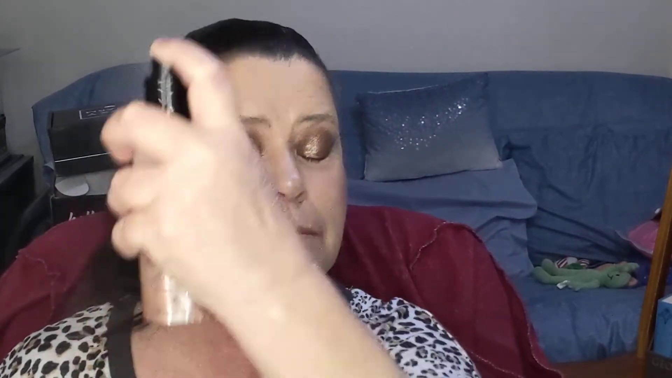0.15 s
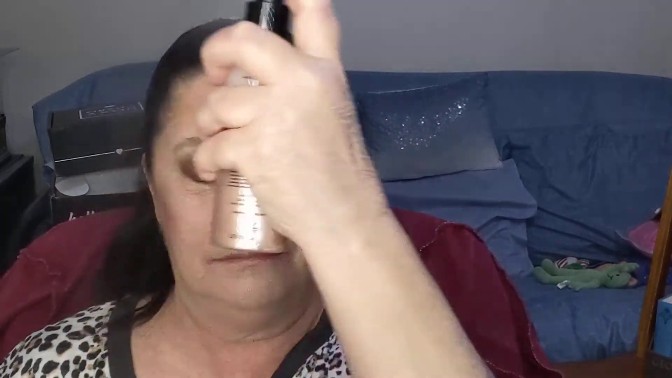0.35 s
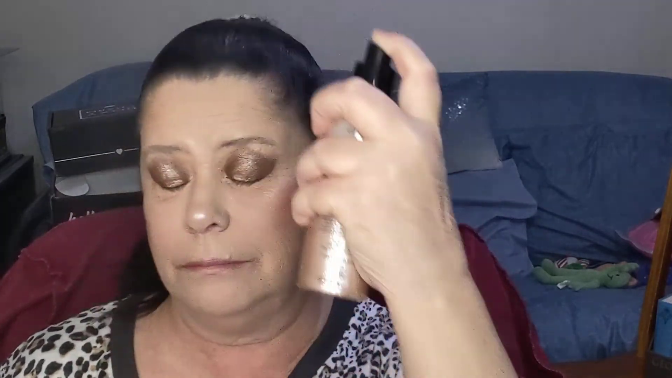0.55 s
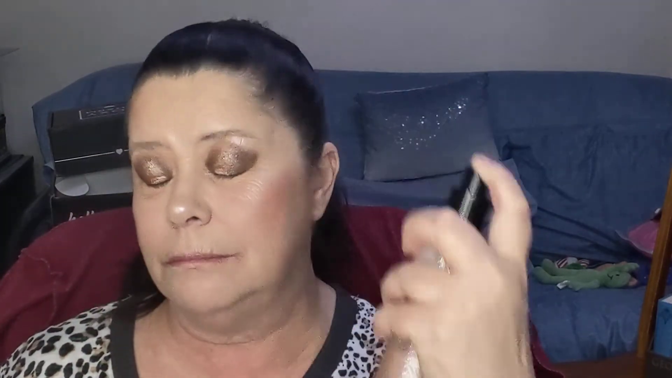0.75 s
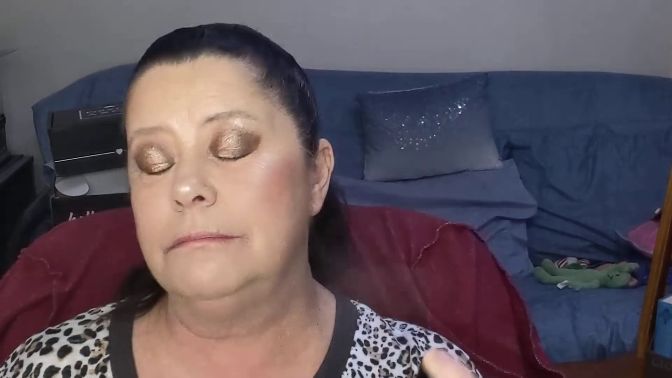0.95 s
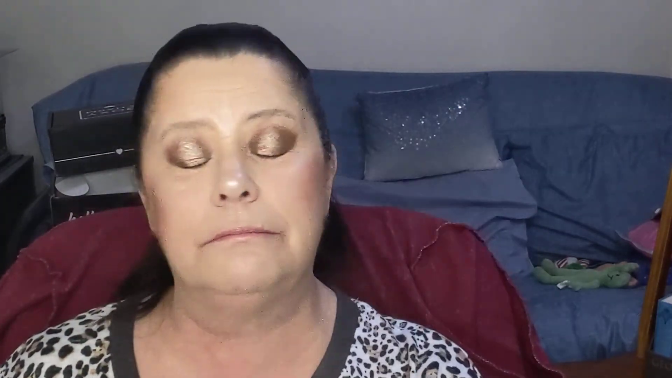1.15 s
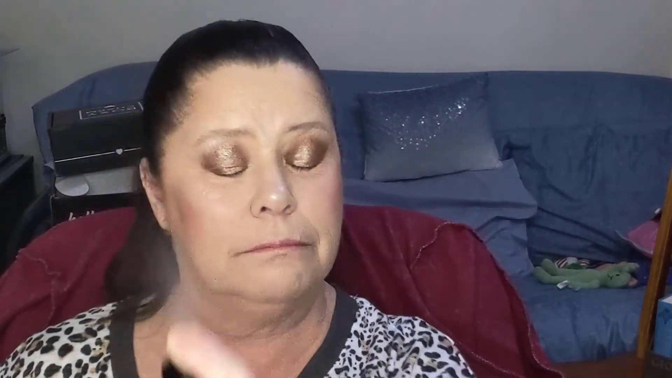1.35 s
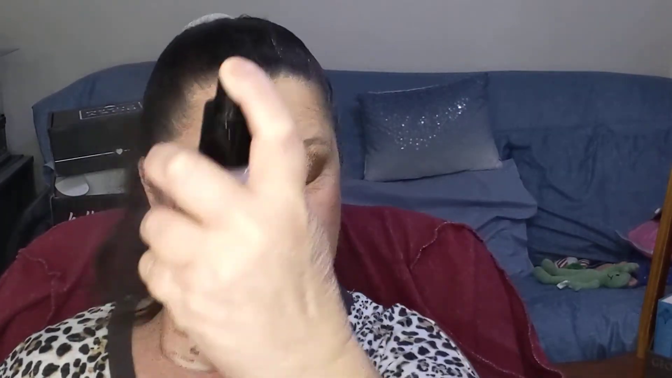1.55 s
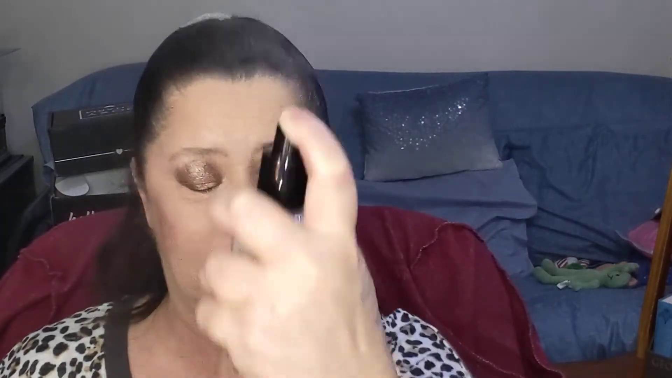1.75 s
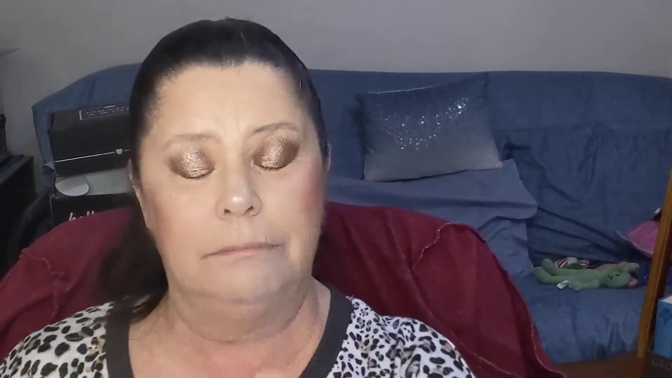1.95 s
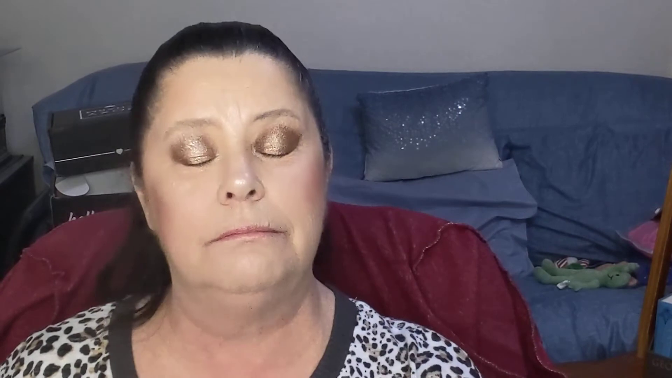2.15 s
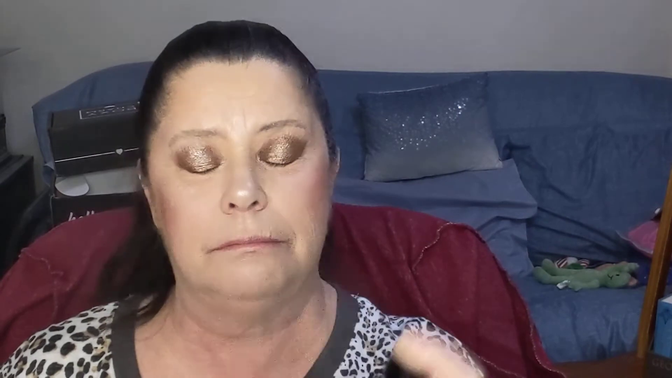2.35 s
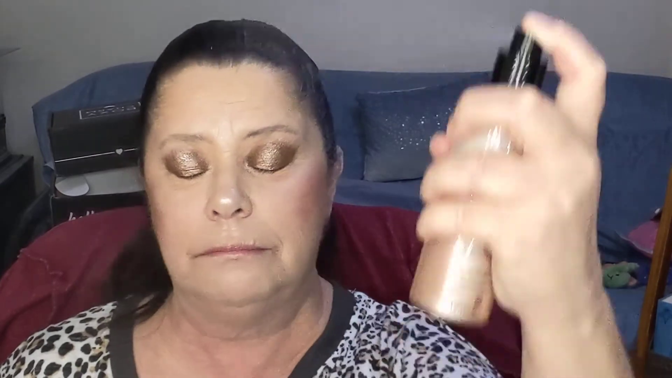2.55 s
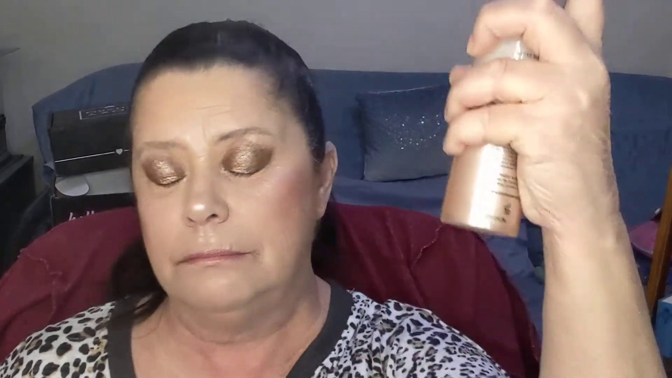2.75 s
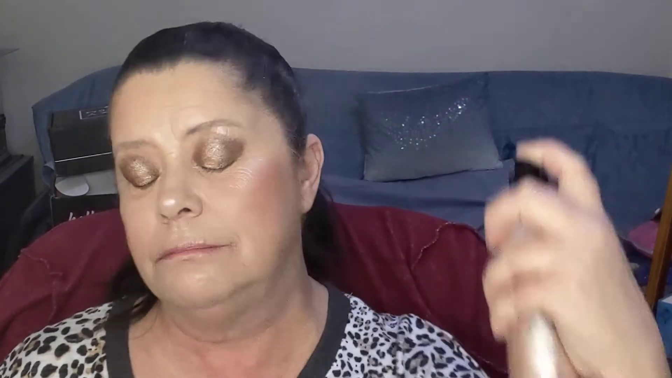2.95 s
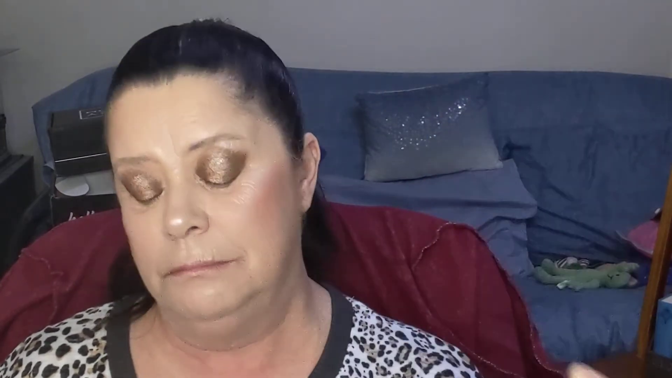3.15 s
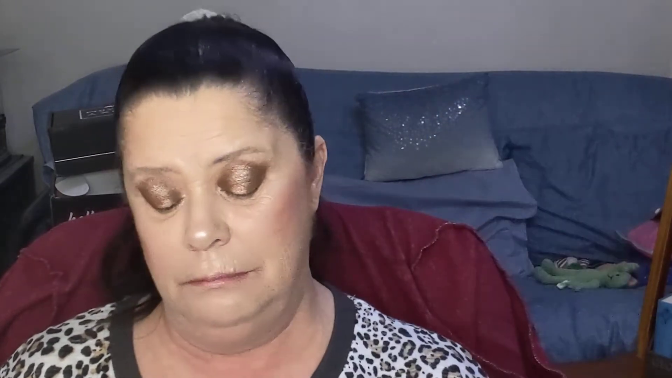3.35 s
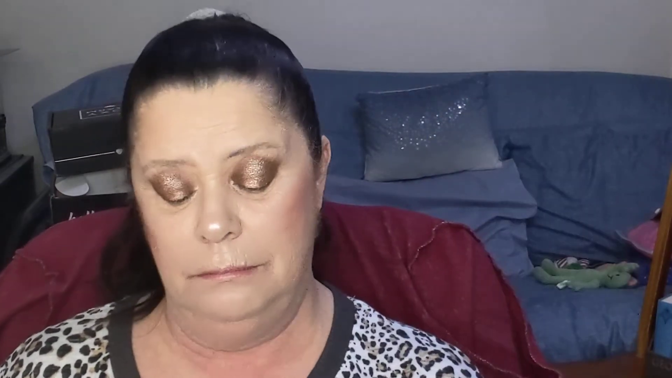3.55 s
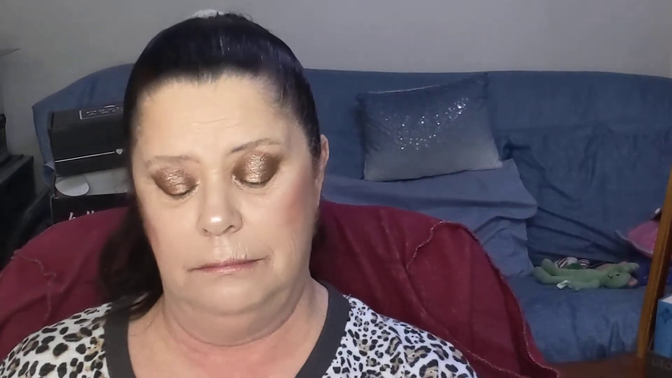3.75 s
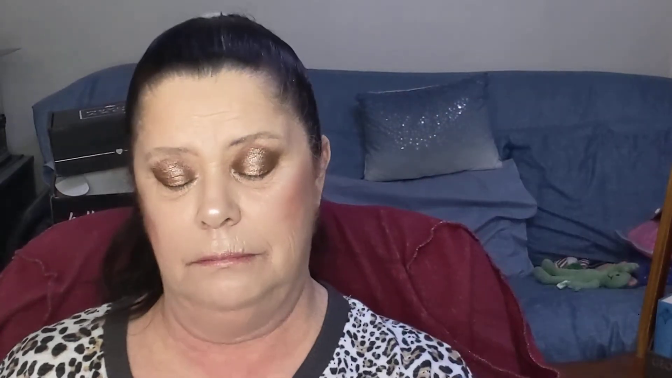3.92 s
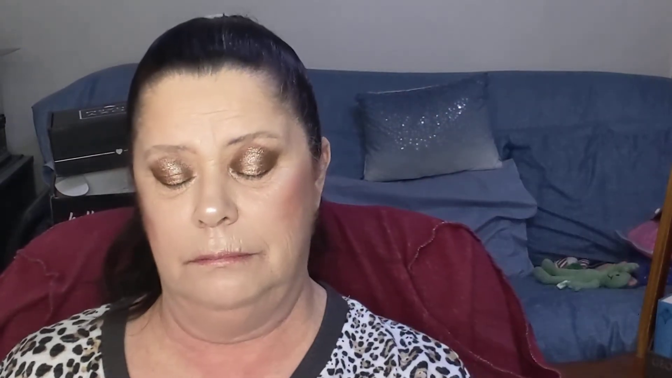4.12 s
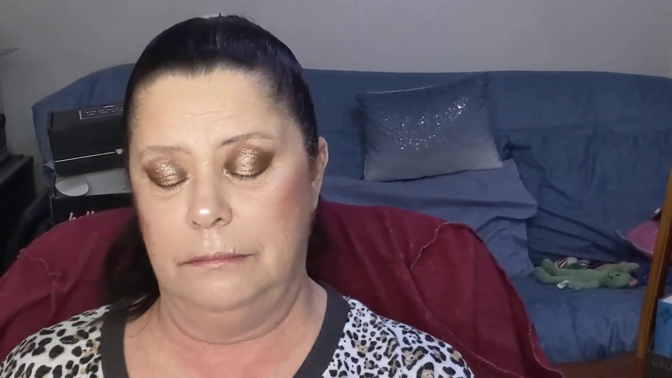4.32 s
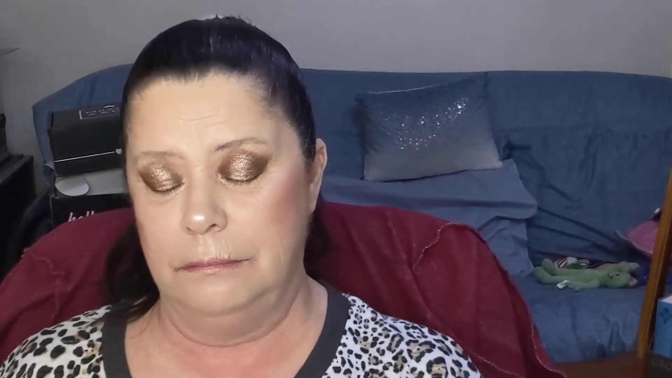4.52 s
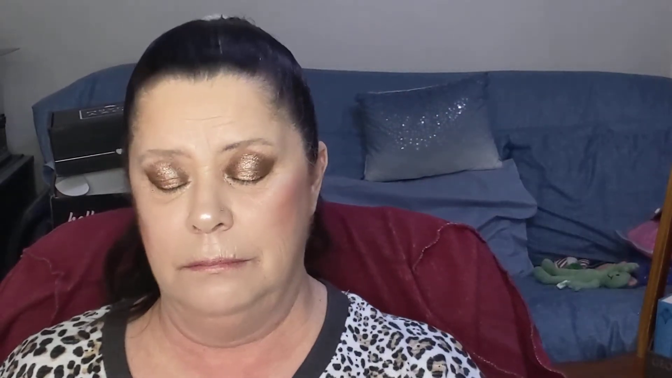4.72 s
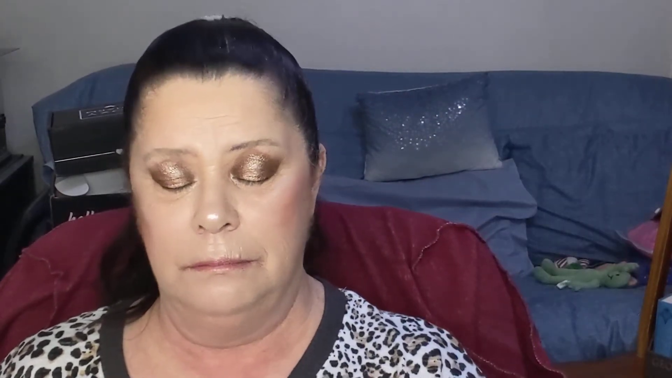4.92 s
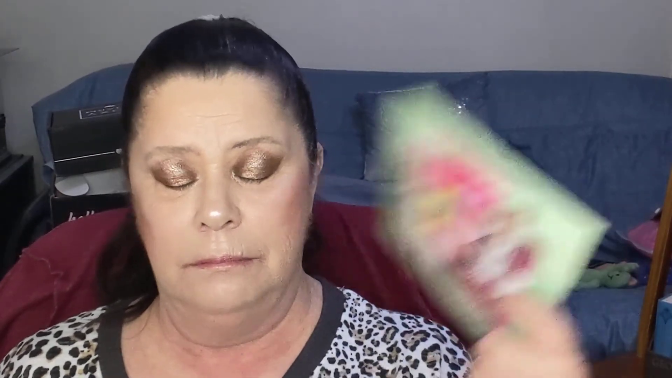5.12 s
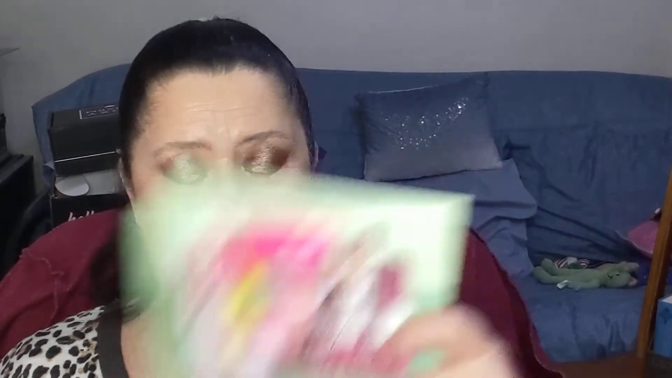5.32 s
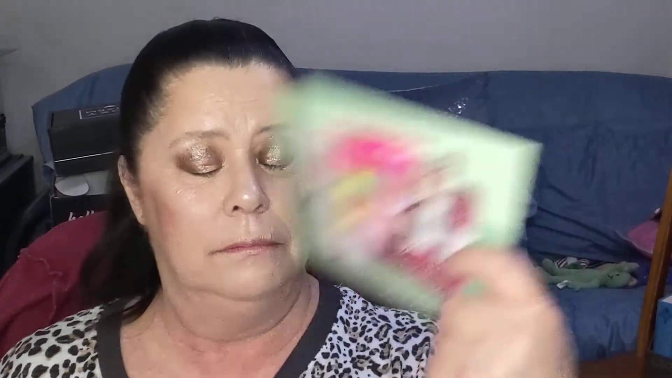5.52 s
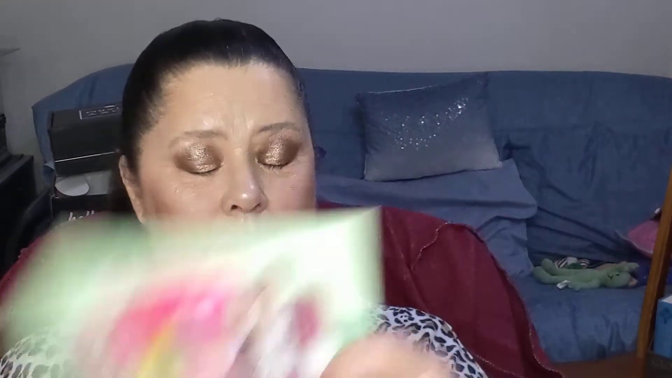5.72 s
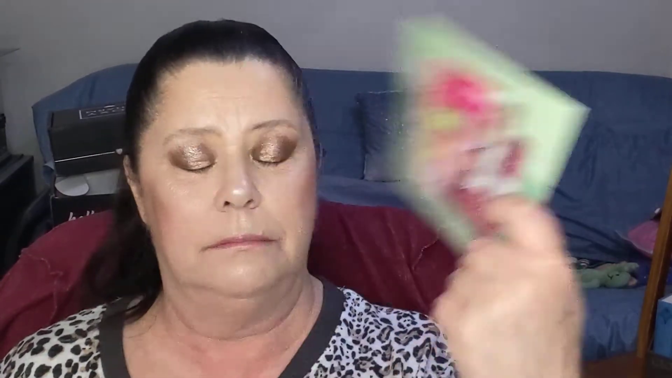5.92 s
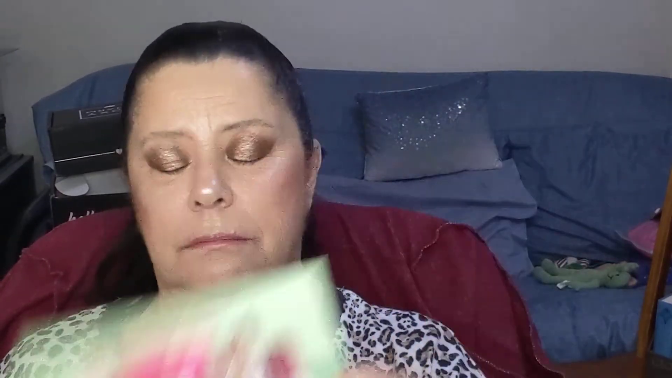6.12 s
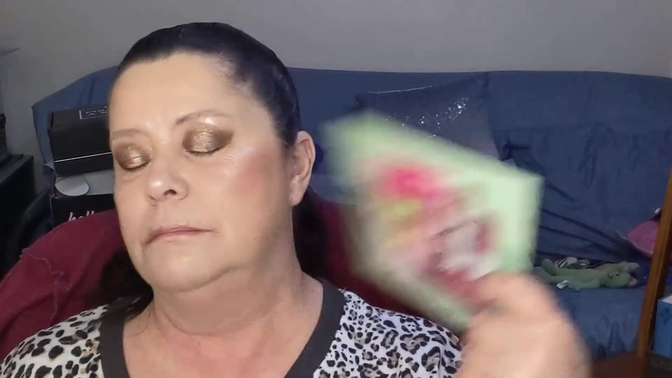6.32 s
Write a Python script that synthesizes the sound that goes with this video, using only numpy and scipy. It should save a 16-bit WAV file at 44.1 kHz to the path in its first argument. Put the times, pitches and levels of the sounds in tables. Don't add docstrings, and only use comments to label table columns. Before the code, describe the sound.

A quiet furnished room with low mains hum, soft air hiss and faint rumble, heard close in stereo. From 0 to 2.95 seconds a small pump bottle is pressed twelve times: strokes end near 0.05, 0.29, 0.52, 0.74, 0.99, 1.28, 1.53, 1.79, 2.05, 2.45, 2.7 and 2.95. Each is a tenth-of-a-second fine, bright hiss, stopped by a sharp plastic knock, with small ticks as the head springs back. The bottle wall pops softly around 1.9. From 3.2 to 3.7 fingers faintly tick and brush the label. At 3.94 the bottle lands on a light table, a loud hollow low thump with clatter, rocking in smaller knocks and a slight scrape until about 4.2. A card is touched at 4.64, snaps crisply at 4.72, then rubs and slides with gritty papery sounds from 4.9 to 5.2, strongest near 5.1. Only quiet room tone remains.

```python
import sys
import numpy as np
from scipy import signal
from scipy.fft import rfft, irfft, next_fast_len
from scipy.io import wavfile
from scipy.ndimage import uniform_filter1d, map_coordinates

SR = 44100
rng = np.random.default_rng(int(sys.argv[2]) if len(sys.argv) > 2 else 0)


def dump(signal):
    limited = np.clip(np.atleast_2d(signal).T, -1, 1)
    pcm = np.round(limited * 32767).astype(np.int16)
    wavfile.write(sys.argv[1], SR, pcm)


def invert_db(x):
    u = np.asarray(x, float) / 20
    return 10 ** u


N = 281358

# (frequency [Hz], level [dB])
AIR_COLOUR = [(150, -43), (250, -10), (324, -12.5), (360, -6), (575, -16), (616, -8.5), (672, -15),
              (887, -11.5), (1300, -12), (1420, -19.5), (1780, -10), (1940, -15), (4610, -22.5),
              (14000, -35.5), (15800, -46)]
RUMBLE_COLOUR = [(12, -44), (20, -23), (43, -11), (70, -12), (99, -6), (119, -3), (161, -0.5), (202, 1.5),
                 (290, -14.5), (330, -12.5), (430, -50.5), (730, -120)]
HUM_TONES = [(120.2, -68.5), (61.5, -79), (178, -75.5)]
# (frequency [Hz], correlation [-1 to 1])
AIR_ALIKE = [(60, 0.75), (180, 0.21), (550, 0.76), (1650, -0.34), (4970, 0.19), (15000, 0.059)]
MIST_ALIKE = [(200, 0.67), (600, 0.95), (1600, 0.98), (4000, 0.43), (8000, 0.17), (15000, 0.23)]
# (frequency [Hz], t60 [s])
ROOM_T60 = [(150, 0.13), (1500, 0.22), (5000, 0.29), (14000, 0.1845)]
# (time [s], left port ahead by [microseconds])
HAND_LEAD = [(0, 25), (.7, 90), (1.2, 21), (2, 60), (2.7, 150), (3.2, 138), (3.8, 0), (4.6, -60),
             (5.3, -53)]
# (frequency [Hz], left minus right [dB])
PORT_DIFFERENCE = [(60, -1.5), (150, 2), (400, -0.5), (2000, -1), (7000, 0), (11000, 4.5), (15000, 11)]

# (start [s], piston at its stop [s], jet level [dB], knock level [dB], spring ping level [dB])
STROKES = [(-.07, .05, -46, -32.5, -54), (.168, .2852, -46.5, -30.5, -54), (.404, .519, -47.5, -33.5, -50),
           (.635, 0.7423, -49.5, -33.5, -47), (0.868, 0.9938, -48.5, -32.5, -45.5),
           (1.145, 1.2835, -46, -29, -52), (1.405, 1.5307, -45, -29.5, -54),
           (1.659, 1.7871, -47, -30.5, -49), (1.925, 2.0459, -47.5, -29, -64),
           (2.338, 2.4549, -46, -29.5, -49), (2.573, 2.6951, -46.5, -28.5, -49),
           (2.826, 2.9455, -48.5, -31.5, -61)]
# (frequency [Hz], level [dB per Hz])
MIST_COLOUR = [(350, -50), (600, -16), (678, -22), (799, -7.5), (1080, -13.5), (1190, -2), (1440, -12),
               (1740, 0.5), (2310, -6), (2510, 0.5), (3300, -2), (5540, -4.5), (9420, -11.5), (11100, -8.5),
               (15600, -21.5)]
SLIT_COLOUR = [(2500, -42), (5000, 2), (7000, -6), (9000, 4), (10800, -7), (12000, 1), (13800, -1),
               (15600, -7)]
# (frequency [Hz], level [dB per Hz])
KNOCK_COLOUR = [(150, -47.5), (250, -20), (420, -8.5), (781, -12.5), (995, -11), (1220, -15), (1820, -4.5),
                (2530, -11), (3280, -18), (4100, -24), (4960, -24), (6420, -19), (9070, -35.5),
                (11000, -20.5), (15500, -57.5)]
# (frequency [Hz], width [Hz], level [dB])
CAP_MODES = [(9100, 300, 0), (10800, 350, -5)]

# (time [s], peak level [dB], brightness [dB per octave])
RETURNS = [(.0961, -49.5, -4.5), (0.149, -52.5, .5), (0.3316, -50.5, -2), (.38, -49.5, 3), (.606, -39, 5),
           (.835, -44, 4.5), (1.3772, -47.5, -3), (1.6355, -60.5, -3), (1.901, -56, -3.5),
           (1.9476, -46, -1.5), (2.2472, -66, -7), (2.5439, -45, .6), (3.051, -60.5, 0.5)]
NAIL_PINGS = [(2.2344, -49, -0.5)]
FINGER_TICKS = [
    (3.2092, -70, -5),
    (3.3354, -55.5, -1),
    (3.5105, -71, 1),
    (3.6099, -52, 5),
    (3.685, -69, 4),
    (4.6444, -67, 2),
    (5.0904, -57, -1),
]
CARD_SNAP = [(4.7188, -44, -0.1)]
# (hollow part level [dB], cap ring level [dB])
TICK_KINDS = [
    (1, -17),
    (-5.5, -13),
    (-13, -27),
    (1.5, -17.5),
]
# (frequency [Hz], level [dB])
TICK_COLOUR = [(300, -85), (1000, -22.5), (2000, 1), (3000, 0), (5000, 3.5), (7500, -2), (10800, -2),
               (13000, -6.5), (16000, -20.5)]
HOLLOW_COLOUR = [(100, -79), (300, -1), (450, 10.5), (800, 4.5), (1300, -2.5), (1800, 6), (2500, -33.5)]

# (frequency [Hz], level [dB], t60 [s], swell [cycles])
LANDING = [(417, -26.5, 0.1, 3.7), (327, -23.5, 0.14, 2.07), (239, -21, 0.17, 1.8), (207, -15, 0.08, 0.64),
           (159.5, -20, 0.2213, 0.944), (125, -21, .2, 2.5), (92.7, -19.5, 0.19, 1.4),
           (64, -28.5, 0.27, 0.38), (32.962, -57, 0.22, .6)]
EDGE = [(327, -39.5, 0.11, 0.981), (211, -48, 0.2636, 1.8), (146, -28, 0.11, 1.65), (71.6, -48, .22, .85)]
ROCK = [(132.05, -29.5, 0.12, 0.99)]
GRIP = [(421, -42.5, 0.046, 0.96), (507, -43, .051, 1.397), (173.5, -46.5, 0.19, 1.1)]
# (time [s], modes as above, level [dB], delay of the wave [cycles])
WAVES = [
    (3.9431, LANDING, 0.5, 2.1),
    (4.1225, EDGE, 0.5, 1.7),
    (4.165, ROCK, -0.5, 1.6),
    (1.908, GRIP[:2], -1.5, .1),
    (1.945, GRIP, 1, .1),
    (2.248, GRIP[:1], -7, .1),
]

# (time fully loud [s], hold [s], level [dB], low part [dB], fade by 30 dB [s])
RUBS = [
    (3.62, .002, -67, -16, 0),
    (3.696, 0.0018, -71, -5, .16),
    (4.644, .01, -67, -9, 0.24),
    (4.882, .004, -62.5, -8.5, 0.08),
    (4.994, .085, -64.5, -12, 0.03),
    (5.094, 0.021, -58.5, 0, 0.11),
    (5.225, .04, -74, -4, 0.3),
]
SLIPS = [(4.108, 0.027, -57.5, -2.5, .11)]
CARD_TAPS = [(4.724, 0.0026, -57, 2.5, 0.072)]
# (frequency [Hz], level [dB per Hz])
PAPER_COLOUR = [(1200, -0.5), (2200, -3.5), (3000, 3.5), (3800, -1), (5000, -0.5), (7000, -5),
                (11000, -5.5), (16000, -17)]
CARD_COLOUR = [(500, -19), (1000, -10), (1400, -11), (1750, -0.5), (2100, -17), (3000, -57)]
SQUEAK_COLOUR = [(1500, -47), (2600, -5), (3100, -3.5), (3800, -14.5), (4700, 1), (5600, -12),
                 (9000, -16.5), (16000, -26.5)]

# (time [s], peak level [dB], brightness [dB per octave], clatter t60 [s])
BLOWS = [
    (3.939, -38, 0, .058),
    (3.9435, -14.5, -3, 0.064),
    (3.9503, -19.5, -3.5, .09),
    (3.9607, -25.5, -6, .09),
    (4.008, -34.5, -9.5, .086),
    (4.037, -34, -6.5, 0.046),
    (4.075, -42.5, -3, .076),
    (4.1225, -35.5, -4.5, 0.13),
]
# (frequency [Hz], level [dB])
BASE_COLOUR = [(100, -95), (400, -13.5), (720, -5), (950, -8), (1150, -6), (1320, -4), (1550, -1.5),
               (1900, -12.5), (2500, -19.5), (3600, -17), (4200, -15.5), (5000, -16.5), (6500, -23.5),
               (11000, -24.5), (15500, -40)]


def unit(x):
    return x / np.sqrt(np.mean(x ** 2) + 1e-20)


def peaked(x, db):
    return invert_db(db) * x / np.abs(x).max()


def along(points, hz):
    f, v = np.transpose(points)
    return np.interp(np.log(hz + 1), np.log(f + 1), v)


def wobble(rate):
    knots = rng.standard_normal(int(N * rate / SR) + 4)
    return map_coordinates(knots, [np.arange(N) * rate / SR])


def filtered(x, response):
    m = 2 * next_fast_len(x.shape[-1] // 2 + 4096)
    return irfft(rfft(x, m) * response(np.fft.rfftfreq(m, 1 / SR)), m)[..., :x.shape[-1]]


def struck(x, spectrum, tilt_db=0):
    def response(hz):
        level_db = along(spectrum, hz) + tilt_db * np.log2((hz + 50) / 1500)
        cepstrum = irfft(np.log(invert_db(level_db) + 1e-6))
        half = len(cepstrum) // 2
        cepstrum[1:half] *= 2
        cepstrum[half + 1:] = 0
        return np.exp(rfft(cepstrum))
    return filtered(x, response)


def ringing(modes, f, scatter_db):
    total = 0
    for k, (centre, width, db) in enumerate(modes):
        gain = (-1) ** k * invert_db(db + scatter_db * rng.standard_normal())
        total = total + gain * 1j * f * width / (centre * centre - f * f + 1j * f * width)
    return total


def rush(spectrum, alike, n=N, patchy_db=0):
    z = signal.stft(rng.standard_normal((2, n + 512)), nperseg=256)[2]
    patches = uniform_filter1d(rng.standard_normal(z.shape[1:]), size=3, axis=0)
    patches = uniform_filter1d(patches, size=14, axis=1)
    pair = signal.istft(z * invert_db(patchy_db * unit(patches)), nperseg=256)[1][:, :n]

    def response(hz):
        turn = np.arccos(np.clip(along(alike, hz), -1, 1)) / 2
        return invert_db(along(spectrum, hz)) * [np.cos(turn), np.sin(turn)]
    mid, side = filtered(pair, response)
    return unit(np.array([mid + side, mid - side]))


def clatter(t, lead, db, t60, crack_db=-14):
    lumps = invert_db(3.5 * unit(uniform_filter1d(rng.standard_normal(len(t)), size=70)))
    after = np.clip(t - lead, 0, 1)
    rattle = invert_db(db - 60 * after / max(t60, .002)) * lumps * np.clip(after / .004, 0, 1)
    crack = invert_db(crack_db - 60 * after / .008)
    x = rng.standard_normal(len(t)) * np.where(t < lead, invert_db(db - 9), rattle + crack)
    x[round(lead * SR) + np.array([0, 10])] = -.3, 1
    return x


def echoes(count):
    hz, t, z = signal.stft(rng.standard_normal((count, 2, SR // 3)), SR, nperseg=256)
    decay = invert_db(-60 * t / along(ROOM_T60, hz)[:, None])
    tails = signal.istft(z * decay, SR, nperseg=256)[1]
    tails = tails / np.linalg.norm(tails[:, :1], axis=2, keepdims=True)
    return np.pad(tails, ((0, 0), (0, 0), (150, 0)))


def add(out, s, x, wet_db):
    ports, tails = out
    x = x * np.ones((2, 1))
    tail = tails[int(rng.random() * len(tails))]
    heard = invert_db(wet_db) * signal.fftconvolve(x, tail, axes=1)
    heard[:, :x.shape[1]] += x
    lead = np.interp(s, *np.transpose(HAND_LEAD)) / 2e6
    for port, arrival in enumerate((s - lead, s + lead)):
        i = round((arrival + 1) * SR)
        ports[port, i:i + heard.shape[1]] += heard[port]


def room_air():
    t = np.arange(N) / SR
    hum = 0
    for hz, db in HUM_TONES:
        hum = hum + invert_db(db + 3 + .8 * wobble(6)) * np.sin(2 * np.pi * hz * t + .2 * wobble(4))
    hiss_db = -73 - 0.2447 * t + 6 + 0.67 * wobble(2.025)
    hiss = invert_db(hiss_db) * rush(AIR_COLOUR, AIR_ALIKE)
    rumble = invert_db(-66.5 + 0.48 * wobble(3)) * rush(RUMBLE_COLOUR, AIR_ALIKE)
    return hiss + rumble + hum * invert_db([[1.5], [-1.5]])


def spray(out):
    bright_db, top = 2.5, 0.56
    colour = [(hz, level + bright_db * np.log2(hz / 5000)) for hz, level in MIST_COLOUR]
    for s, stop, db, *_ in STROKES:
        t = np.arange(round((stop - s + .02) * SR)) / SR
        u = t / (stop - s)
        rising_db = -7 * np.abs(1 - u / top) ** 2
        falling_db = -9 * np.abs((u - top) / (1 - top)) ** 0.49
        pressure_db = np.where(u < top, rising_db, falling_db)
        gate = np.clip(t / 0.009, 0, 1) * invert_db(-900 * np.clip(t - stop + s, 0, 1))
        jet = invert_db(pressure_db) * rush(colour, MIST_ALIKE, len(t), patchy_db=2.0)
        slit = invert_db(-11 + 0.51 * pressure_db) * rush(SLIT_COLOUR, MIST_ALIKE, len(t))
        spit = invert_db(1.3 * uniform_filter1d(rng.standard_normal(len(t)), size=9))
        add(out, s, invert_db(db) * gate * spit * (jet + slit), wet_db=-6.0)


def piston_knocks(out):
    t = np.arange(SR // 10) / SR
    for _, stop, _, db, _ in STROKES:
        contact = clatter(t, .005, -27.5, t60=.1, crack_db=-19)
        knock = struck(contact, KNOCK_COLOUR, -0.07)
        add(out, stop - .004, peaked(knock, db + 5.5), wet_db=-5)


def spring_pings(out):
    t = np.arange(SR // 10) / SR
    lift_share = .36
    for start, stop, _, _, db in STROKES:
        ping = filtered(clatter(t, 0, -12, 0.018), lambda f: ringing(CAP_MODES, f, scatter_db=-2.5))
        add(out, stop + lift_share * (stop - start), peaked(ping, db), wet_db=-5.5)


def light_ticks(out):
    t = np.arange(SR // 10) / SR
    hollow_per_bright = 1.04
    for rows, (hollow_db, ring_db) in zip((RETURNS, NAIL_PINGS, FINGER_TICKS, CARD_SNAP), TICK_KINDS):
        for s, db, bright_db in rows:
            t60 = 0.045 - 0.04 * (db + 65)
            crack = clatter(t, .0015, -8, t60 * .6, crack_db=-2)
            bright = struck(crack, TICK_COLOUR, bright_db)
            ring = filtered(bright, lambda f: ringing(CAP_MODES, f, scatter_db=-6.0))
            bright = bright + invert_db(min(ring_db, -4) + 15.0) * ring
            body = peaked(struck(crack, HOLLOW_COLOUR), db + hollow_db - hollow_per_bright * bright_db)
            add(out, s - .001, peaked(bright, db + 9.5) + body, wet_db=-4.5)


def surface_waves(out):
    t = np.arange(SR // 4) / SR
    for s, modes, db, late in WAVES:
        wave = 0
        for hz, level, t60, swell in modes:
            since = np.clip(t - late / hz, 0, 1)
            growth = 1 - np.exp(-(since * hz / swell) ** 2)
            wave = wave + invert_db(level - 60 * since / t60) * np.sin(2 * np.pi * hz * since) * growth
        add(out, s, invert_db(db) * wave, wet_db=-13)


def rubbing(out):
    kinds = [(SLIPS, SQUEAK_COLOUR, HOLLOW_COLOUR, 400),
             (CARD_TAPS, PAPER_COLOUR, HOLLOW_COLOUR, np.inf),
             (RUBS, PAPER_COLOUR, CARD_COLOUR, 1100)]
    for rows, colour, dull_colour, rise in kinds:
        for s, hold, db, low_db, fade in rows:
            t = np.arange(-30 / rise, hold + fade, 1 / SR)
            level_db = np.interp(t, [t[0] - 1e-6, 0, hold, hold + fade], [db - 30, db, db, db - 30])
            grit = invert_db(18.0 * uniform_filter1d(rng.standard_normal(len(t)), size=36))
            scrape = rush(colour, MIST_ALIKE, len(t), patchy_db=1.5)
            dull = invert_db(low_db) * rush(dull_colour, MIST_ALIKE, len(t))
            add(out, s + t[0], grit * invert_db(level_db) * (scrape + dull), wet_db=-15.0)


def base_blows(out):
    t = np.arange(SR // 4) / SR
    for s, db, bright_db, t60 in BLOWS:
        contact = clatter(t, 0, -22, t60, crack_db=-9)
        add(out, s, peaked(struck(contact, BASE_COLOUR, bright_db), db), wet_db=-2.0)


def scene():
    air = room_air()
    out = np.zeros((2, N + 2 * SR)), echoes(count=12)
    for source in (spray, piston_knocks, spring_pings, light_ticks, surface_waves, rubbing, base_blows):
        source(out)
    return out[0][:, SR:SR + N] + air


def top_cut(x):
    return signal.sosfilt(signal.butter(12, 16700, fs=SR, output="sos"), x)


def record(dry):
    def ports(hz):
        return invert_db(along(PORT_DIFFERENCE, hz) * [[.5], [-.5]]) * (hz < 15860)
    mix = filtered(dry, ports)
    return top_cut(mix)


dry = scene()
out = record(dry)
dump(out)
```